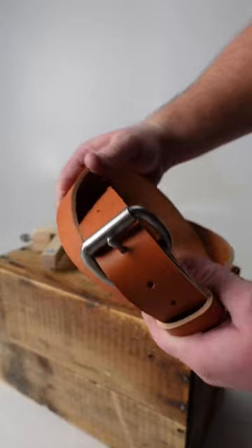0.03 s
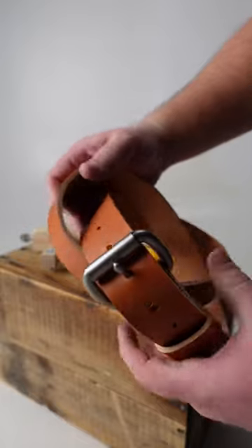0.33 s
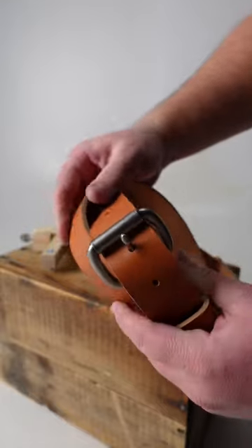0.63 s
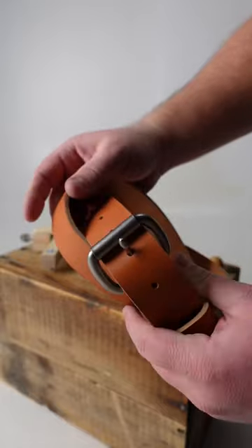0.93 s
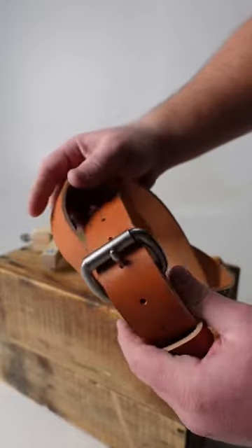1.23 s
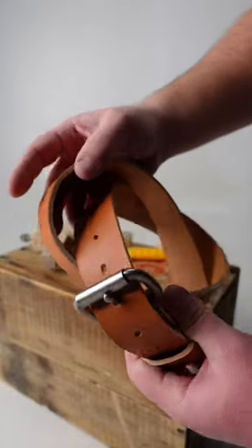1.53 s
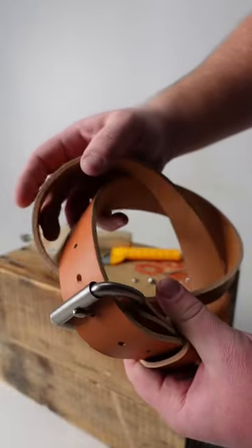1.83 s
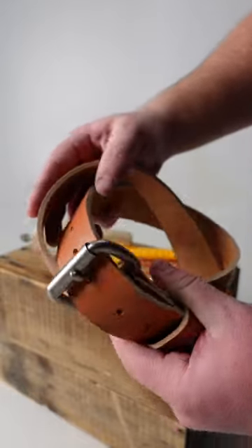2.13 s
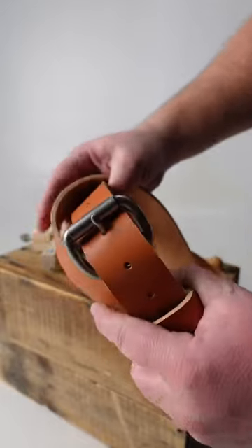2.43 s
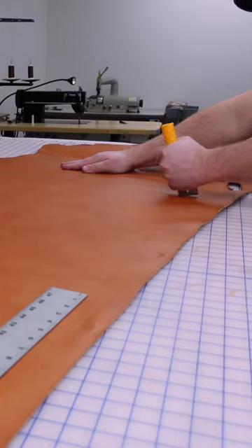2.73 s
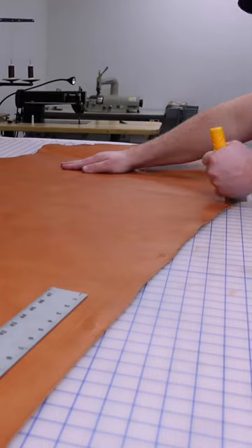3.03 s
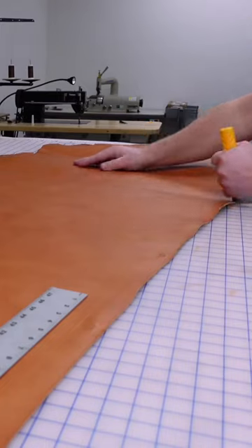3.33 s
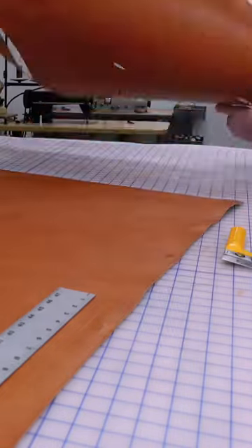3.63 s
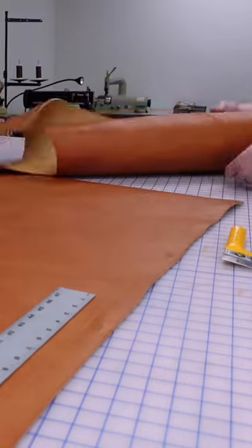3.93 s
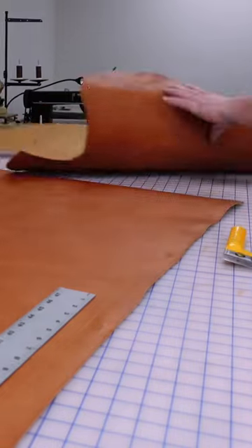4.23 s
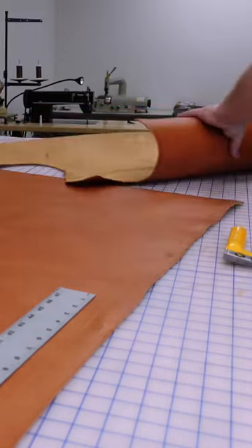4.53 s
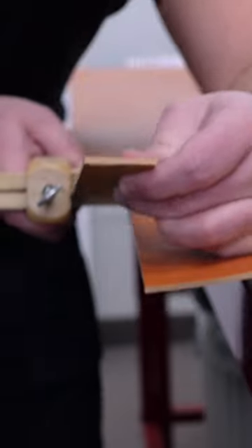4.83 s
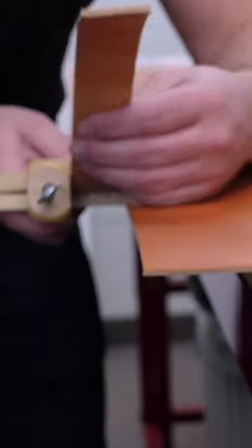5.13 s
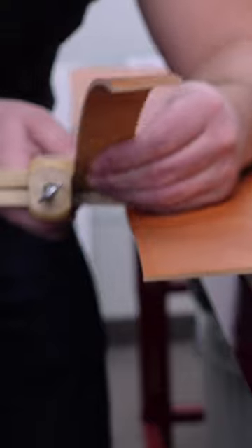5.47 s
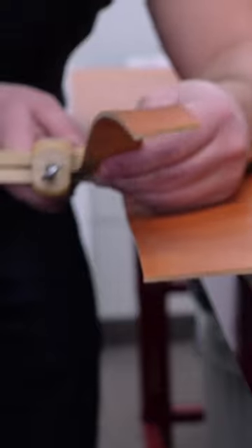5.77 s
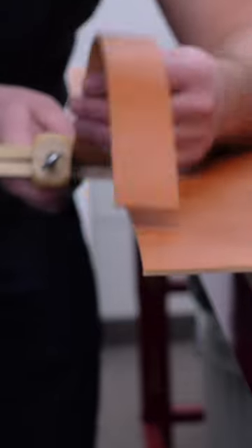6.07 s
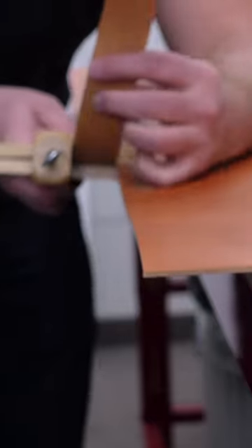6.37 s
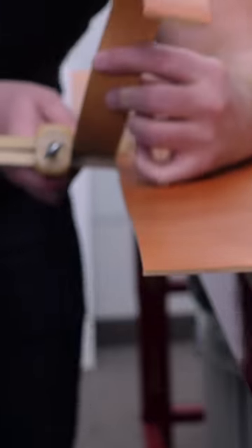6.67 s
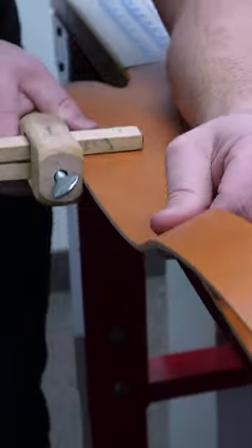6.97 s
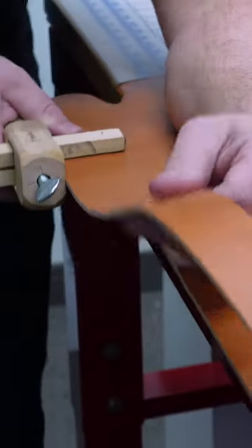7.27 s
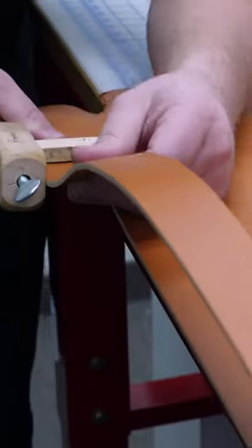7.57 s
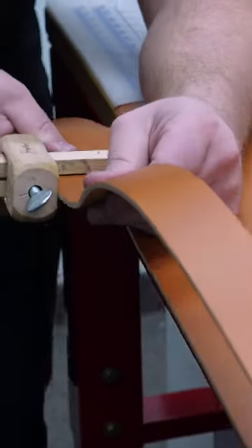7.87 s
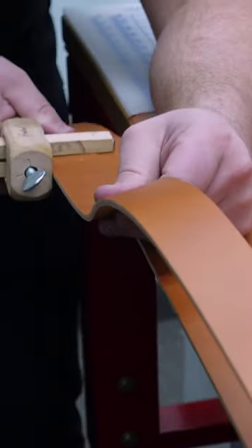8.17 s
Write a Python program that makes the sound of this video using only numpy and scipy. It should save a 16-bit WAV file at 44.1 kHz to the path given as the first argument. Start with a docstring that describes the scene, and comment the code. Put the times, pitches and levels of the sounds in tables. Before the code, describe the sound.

A leather belt rubs and its steel buckle clicks, then a hide is cut, flopped onto a table and sliced in rasping strokes.

```python
"""A leather belt rubs and creaks close by as hands flex it, its steel buckle clicking and knocking.
A rotary knife rolls through a hide on a workshop table; the offcut slides, flops down and cracks on
the mat. Then a wooden strap cutter is drawn along the hide in five strokes, its blade singing in the
first three, the hand sliding to a new grip in between. Rubs and cuts are the hiss and tiny snaps of
catching fibres; knocks and flops ring in damped modes. A low room rumble lies underneath."""
import sys
import numpy as np
from scipy import signal
from scipy.fft import rfft, irfft
from scipy.io import wavfile
from scipy.ndimage import uniform_filter1d

SR = 44100
rng = np.random.default_rng(int(sys.argv[2]) if len(sys.argv) > 2 else 0)


def materialize(psi):
    """Save the field psi as 16-bit PCM at rate SR to the path in sys.argv[1].

    A 1-D psi becomes a single channel; in a 2-D psi each row is a channel.
    """
    bounded = np.clip(np.atleast_2d(psi).T, -1, 1)
    quanta = np.round(bounded * 32767).astype(np.int16)
    wavfile.write(sys.argv[1], SR, quanta)


N = 366030
TIME = np.arange(N) / SR
HIT_SAMPLES = SR // 3
# four stretches of work, joined by hard cuts: from_s, to_s
AT_BELT, AT_TABLE, AT_STRAP_END, AT_MID_STRAP = (.034, 2.603), (2.603, 4.602), (4.602, 6.836), (6.836, 8.4)


def from_db(db):
    """Decibels to gain."""
    return 10 ** (np.asarray(db) / 20)


def rms_one(x):
    """Scale to unit rms."""
    return x / np.sqrt(np.mean(x ** 2) + 1e-20)


def peak_one(x):
    """Scale to unit peak."""
    return x / np.max(np.abs(x))


def band(x, hz, kind, order=2):
    """Butterworth filter."""
    return signal.sosfilt(signal.butter(order, np.clip(hz, 10, .45 * SR), kind, fs=SR, output="sos"), x)


def noise_band(edges_hz):
    """Steady band of noise at unit rms."""
    return rms_one(band(rng.standard_normal(N), edges_hz, "band"))


def colour(x, curve, size=4096):
    """Minimum-phase EQ along a curve of freq_hz, gain_db."""
    hz, db = np.transpose(curve)
    grid_hz = np.maximum(np.fft.rfftfreq(size, 1 / SR), 1)
    gain = from_db(np.interp(np.log(grid_hz), np.log(hz), db))
    cepstrum = irfft(np.log(gain))
    cepstrum[1:size // 2] *= 2
    cepstrum[size // 2 + 1:] = 0
    impulse = irfft(np.exp(rfft(cepstrum)))
    return signal.oaconvolve(x, impulse)[:len(x)]


def fade(t60):
    """Decay envelope that drops 60 dB in t60 seconds."""
    return from_db(-60 * TIME[:HIT_SAMPLES] / t60)


def burst(t60):
    """Noise that dies away."""
    return fade(t60) * rng.standard_normal(HIT_SAMPLES)


def ring(modes, spread_db, length=1, pitch=1):
    """One blow on a set of modes, each struck with a strength of its own; unit peak."""
    out = np.zeros(HIT_SAMPLES)
    for k, (hz, db, t60) in enumerate(modes):
        strength = (-1) ** k * from_db(db + spread_db * rng.standard_normal())
        out += strength * fade(t60 * length) * np.sin(2 * np.pi * hz * pitch * TIME[:HIT_SAMPLES])
    return peak_one(out)


def add(out, start_s, sound):
    """Mix a sound in at its cue."""
    start = round(start_s * SR)
    out[start:start + len(sound)] += sound[:N - start]


def during(span):
    """Gate that is open for a span of time, with short ramps."""
    return uniform_filter1d(1. * ((TIME >= span[0]) & (TIME < span[1])), size=128)


def swell(peak_s, rise_s, fall_s, hold_s=0):
    """Envelope of one movement; it is 10 dB down rise_s before the peak and fall_s after the hold."""
    away = np.maximum((peak_s - TIME) / rise_s, (TIME - peak_s - hold_s) / fall_s)
    roundness = 1.55  # 1 is a pointed swell, 2 a rounded one
    return from_db(-10 * np.clip(away, 0, 4) ** roundness) * (away < 4)


def rubs(rows):
    """Body and hiss envelopes of a series of rubs; where they overlap their powers add."""
    return np.sqrt(sum((from_db([[body_db], [hiss_db]]) * swell(peak_s, rise_s, fall_s)) ** 2
                       for peak_s, rise_s, fall_s, body_db, hiss_db in rows))


def friction(gains, curve, grains_per_s, grain_db, judder_db, resonances=()):
    """Fibres catch and snap as tiny clicks over a smooth hiss, while the whole contact judders."""
    snaps = (rng.random(N) < grains_per_s / SR) * rng.standard_normal(N)
    contact = rng.standard_normal(N) + from_db(grain_db) * rms_one(snaps)
    judder = rms_one(np.interp(TIME * 100, np.arange(N), rng.standard_normal(N)))  # 100 turns a second
    sound = colour(contact * from_db(judder_db * judder), curve)
    for hz, width_hz, boost_db in resonances:
        resonance = signal.lfilter(*signal.iirpeak(hz, hz / width_hz, fs=SR), sound)
        sound = sound + (from_db(boost_db) - 1) * resonance
    body = rms_one(band(sound, 2000, "low", order=3))
    hiss = rms_one(band(sound, 2000, "high", order=3))
    return gains[0] * body + gains[1] * hiss


# passes of the belt over itself: peak_s, rise_s, fall_s, body_db, hiss_db
BELT_RUBS = [(.06, 0.12, 0.072, -55, -51), (.175, 0.076, 0.068, -48.5, -48.5),
             (.32, 0.065, .08, -53.5, -50.5), (.51, 0.051, 0.21, -54, -54.5), (.67, 0.13, 0.13, -60, -49),
             (.89, 0.052, 0.066, -54, -52.5), (1.035, 0.054, 0.11, -56, -54),
             (1.21, 0.06, 0.12, -55, -49.5), (1.5, .14, 0.095, -63.5, -51),
             (1.665, 0.033, 0.018, -43.5, -48), (1.81, 0.24, 0.14, -59, -53.5),
             (2.11, 0.16, 0.13, -60.5, -58), (2.335, 0.062, 0.024, -56, -57), (2.53, 0.1, 0.11, -60.5, -49)]
# tone of leather on leather: freq_hz, gain_db
BELT_EQ = [(88, -40), (150, -9), (275, -16.5), (414, -10.5), (448, -15.5), (805, -3), (1560, -6.5),
           (2270, -9), (2550, -11.5), (3160, -7.5), (3550, -10.5), (8560, -14), (10400, -16.5),
           (13200, -13.5), (16000, -22.5)]
# resonances of the belt's loop: centre_hz, width_hz, boost_db
BELT_RESONANCES = [(753, 120, 7), (2260, 190, 3.5)]


def belt_rubs():
    """The flexed belt slides over itself with a grainy, juddering rub."""
    return friction(rubs(BELT_RUBS) * during(AT_BELT), BELT_EQ,
                    grains_per_s=700, grain_db=-2.5, judder_db=2.2, resonances=BELT_RESONANCES)


# steps in the rumble of room and bench: start_s, level_db
RUMBLE_STEPS = [(.034, -70), (2.603, -41), (3.161, -31), (3.503, -41), (4.07, -34.5), (4.602, -66.5),
                (6.836, -50.5), (7.5, -51)]
# sub-heavy tone of the rumble: freq_hz, gain_db
RUMBLE_EQ = [(8.8, -30), (15, 13.5), (26, -6.5), (43, -12), (91, -31), (156, -31.5), (200, -31.5),
             (260, -53.5), (440, -120)]
# tone of the workshop air: freq_hz, gain_db
AIR_EQ = [(53, -21), (90, 8.5), (385, -4.5), (753, -0.5), (1440, -7.5), (6440, -10), (8530, -14),
          (10400, -16), (13200, -13.5), (16000, -31)]


def room_tone():
    """The bed under the work: rumble of room and bench, steady air and a faint low drone."""
    starts_s, levels_db = np.transpose(RUMBLE_STEPS)
    steps = np.append(0, from_db(levels_db))[np.searchsorted(starts_s, TIME)]
    rumble = rms_one(colour(rng.standard_normal(N), RUMBLE_EQ, size=16384))
    air = rms_one(colour(rng.standard_normal(N), AIR_EQ))
    drone = noise_band(edges_hz=[45.4, 66.4])
    return uniform_filter1d(steps, size=256) * rumble + from_db(-66.5) * air + from_db(-71.5) * drone


# single slips of the leather: start_s, level_db, centre_hz
CREAK_SLIPS = [(.196, -33, 860), (.204, -30, 1200), (.242, -37, 5130), (.247, -24.5, 7200),
               (.413, -35.5, 2900), (.551, -29, 8770), (.666, -37, 2330), (.679, -31, 2790),
               (.795, -32, 1670), (1.99, -34, 3120), (2.31, -36.5, 1680), (2.38, -40, 1100),
               (2.501, -34.5, 810), (3.132, -25, 3000), (5.333, -41, 910), (7.872, -32.5, 1120)]
# runs of fainter ticks: start_s, length_s, level_db, centre_hz
CREAK_RUNS = [(0.709, .08, -33, 5450), (2.077, .17, -39, 3560), (5.887, .05, -52, 1100),
              (7.186, .05, -48, 1450)]


def creaks(gap_s=.021, spread_db=2.5, spread_octaves=.63):
    """Each slip of the leather is a short, broad tick; under strain they come in uneven runs."""
    out, slips = np.zeros(N), list(CREAK_SLIPS)
    for start_s, length_s, db, hz in CREAK_RUNS:
        for k, (late, softer, higher) in enumerate(rng.standard_normal((16, 3))):
            if k * gap_s < length_s:
                tick_s = start_s + gap_s * (k + .1 * late)
                slips.append((tick_s, db - spread_db * softer, hz * 2 ** (spread_octaves * higher)))
    for start_s, db, hz in slips:
        tick = band(burst(t60=.029), [hz * .51, hz * 1.7], "band", order=1)
        add(out, start_s, from_db(db) * peak_one(tick))
    return band(out, 10800, "low")


# steel on steel: start_s, level_db, decay_ratio
BUCKLE_CLICKS = [(0.5875, -15.5, 1.14), (0.639, -15, 1.3), (1.081, -24, 1.1), (1.1283, -19.5, 0.51),
                 (1.1617, -19, 0.6), (1.1918, -16, 0.98), (1.209, -26, 0.61), (1.2347, -12, 1.2),
                 (1.2406, -27, 0.91), (1.294, -20.5, 0.79), (1.46, -44.5, .9), (2.4389, -20.5, 0.56)]
# bright ring of the steel: pitch_hz, level_db, t60_s
STEEL_MODES = [(2320, -12, 0.044), (3100, -16, 0.021), (5850, -14, 0.015), (7470, -3, 0.005),
               (8300, -8.5, 0.017), (8690, -9, 0.044), (8750, -40, 0.42), (8750, -19, 0.022),
               (9870, -21, 0.031), (11600, -29, 0.033), (12950, -21, 0.031), (14850, -26, 0.069),
               (15620, -19, 0.015)]
# buckle against strap: start_s, level_db, snap_offset_db
BUCKLE_KNOCKS = [(0.5815, -9.5, 1.5), (0.5845, -20, 2), (1.2045, -20, 6), (1.6929, -19.5, 5),
                 (1.703, -28.5, 14), (1.7056, -31, 6), (1.822, -25.5, -11), (2.521, -28.5, -1),
                 (2.525, -16.5, -8.5)]
# dull ring of a knock: pitch_hz, level_db, t60_s
KNOCK_MODES = [(764, 4, 0.039), (936, 7.5, 0.026), (1220, -4.5, 0.024), (1530, -13, 0.004),
               (2260, -23, 0.017), (3100, 0, 0.036), (4300, 0, 0.0027)]


def buckle():
    """Steel clicks ring briefly, damped by the strap; knocks on the leather are duller."""
    out = np.zeros(N)
    for start_s, db, decay_ratio in BUCKLE_CLICKS:
        contact = peak_one(band(burst(t60=.0047), 3800, "high"))
        steel = ring(STEEL_MODES, spread_db=3.5, length=decay_ratio)
        add(out, start_s, from_db(db - 2) * steel + from_db(db + 2) * contact)
    for start_s, db, snap_db in BUCKLE_KNOCKS:
        snap = peak_one(band(burst(t60=.028), [1200, 9000], "band"))
        knock = ring(KNOCK_MODES, spread_db=3)
        add(out, start_s, from_db(db - 10) * knock + from_db(db + snap_db - 4.5) * snap)
    return out


# bends of the leather: peak_s, rise_s, fall_s, level_db, centre_hz
GROANS = [(1.606, 0.013, 0.1, -55.5, 238.6), (3.637, .004, 0.036, -46.5, 600),
          (6.135, 0.012, 0.03, -52.5, 680), (6.605, 0.018, 0.026, -45.5, 620),
          (6.88, .03, 0.036, -54.5, 170), (7.111, 0.027, 0.02, -50.5, 647), (7.387, 0.029, 0.014, -56, 800),
          (7.49, 0.019, .025, -53, 850), (7.628, 0.016, 0.065, -50.5, 433), (7.8, 0.04, .045, -54.5, 840),
          (7.91, 0.018, 0.048, -55, 750), (8.14, .012, 0.021, -55, 147.5)]


def groans():
    """Bending leather groans softly in one broad, low band."""
    return sum(from_db(db) * swell(peak_s, rise_s, fall_s) * noise_band([hz / 1.5, hz * 1.5])
               for peak_s, rise_s, fall_s, db, hz in GROANS)


# last push through the edge: peak_s, rise_s, fall_s, body_db, hiss_db
KNIFE_PUSH = [(3.12, 0.066, 0.05, -42, -48)]
# dark tone of the rolling blade: freq_hz, gain_db
KNIFE_EQ = [(71, -10), (120, -8), (301, -9), (341, -10), (445, -3), (592, -7), (643, -2), (839, 0.5),
            (1190, -9), (1980, -16.5), (2290, -22), (8660, -29), (10400, -31), (13300, -33.5), (16000, -43)]


def rotary_knife(full_s=2.58, leaves_s=3.11, body_db=-37, hiss_db=-43):
    """The blade rolls through the hide, fading as the pressure eases; a last push cuts the edge."""
    pressure = swell(full_s, rise_s=.18, fall_s=.22, hold_s=.27)
    in_hide = swell(full_s, rise_s=.18, fall_s=.045, hold_s=leaves_s - full_s)
    rolling = in_hide * [from_db(body_db) * pressure, from_db(hiss_db) * pressure ** .54]
    gains = np.hypot(rolling, rubs(KNIFE_PUSH)) * during(AT_TABLE)
    return friction(gains, KNIFE_EQ, grains_per_s=1500, grain_db=-4.5, judder_db=1.5)


# moves to a new grip: peak_s, rise_s, fall_s, body_db, hiss_db
HAND_SLIDES = [(3.38, 0.061, 0.065, -48.5, -40.5), (3.505, 0.0085, 0.11, -52.5, -46),
               (4.94, 0.034, .04, -65, -57.5), (5.04, 0.047, 0.077, -65, -52.5),
               (5.18, 0.12, 0.086, -81, -58.5), (5.9, 0.07, 0.029, -58, -65),
               (6.02, 0.21, 0.19, -66.5, -56.5), (6.385, 0.051, 0.02, -71, -60.5),
               (6.8, 0.027, 0.058, -60.5, -62), (7.37, 0.063, 0.047, -55.5, -49.5),
               (7.49, 0.12, 0.093, -59.5, -48), (7.635, 0.024, 0.03, -46, -57.5),
               (7.78, 0.064, 0.033, -53, -61.5)]
# tone of skin on leather: freq_hz, gain_db
HAND_EQ = [(88, -20), (150, -9), (244, -9.5), (675, -8), (716, -0.5), (837, -10), (979, -11), (1190, -10),
           (2700, -12.5), (8730, -12), (10400, -13), (13200, -13), (16000, -22.5)]


def hand_slides():
    """The hand brushes over the leather with a sparse grain."""
    return friction(rubs(HAND_SLIDES), HAND_EQ, grains_per_s=520, grain_db=-5, judder_db=1.16)


# drags over the mat: peak_s, rise_s, fall_s, body_db, hiss_db
HIDE_SLIDES = [(3.775, 0.075, 0.027, -52, -55.5), (3.83, 0.035, 0.024, -49, -57.5),
               (4.02, 0.088, 0.083, -40, -55.5), (4.275, 0.021, 0.046, -58, -33.5),
               (4.37, 0.16, 0.17, -40.5, -38.5)]
# tone of hide on the mat, sliding or slapping: freq_hz, gain_db
HIDE_EQ = [(71, -41.5), (120, -5), (261, 0.5), (712, 2), (1620, -2), (2340, -7.5), (3590, -7), (6500, -10),
           (8840, -18.5), (10600, -18.5), (13300, -19), (16000, -29)]


def hide_slides():
    """The loose hide swishes as it drags over the mat."""
    gains = rubs(HIDE_SLIDES) * during(AT_TABLE)
    return friction(gains, HIDE_EQ, grains_per_s=1100, grain_db=-7, judder_db=1.4)


# landings on the table: start_s, level_db, slap_offset_db, slap_t60_s, pitch_ratio
HIDE_FLOPS = [(3.7547, -16.5, -24, .098, 1.06), (3.7624, -26, -16, 0.13, 1.18),
              (3.854, -14, -10, 0.15, 1.5), (3.876, -12, -4.5, 0.085, 1.42), (3.889, -18, -6.5, 0.23, 1.1),
              (3.928, -28, -15.5, .087, 0.84), (3.985, -15.5, -5, 0.13, 1.6),
              (4.215, -26.5, -6, 0.023, 1.55), (4.264, -21.5, -1.5, 0.14, 1.09)]
# low thump of the sheet: pitch_hz, level_db, t60_s
HIDE_MODES = [(176.5, -14.5, 0.087), (275, -7, 0.057), (378, -4.5, 0.045), (448.7, 1, 0.04),
              (463, 0, 0.021), (647, -8.5, 0.019), (860, -14.5, 0.018)]


def hide_flops():
    """The sheet thumps in its low modes, and a slap spreads as more of it meets the table."""
    out = np.zeros(N)
    for start_s, db, slap_db, slap_t60, pitch in HIDE_FLOPS:
        slap = rms_one(colour(rng.standard_normal(HIT_SAMPLES), HIDE_EQ)) * fade(slap_t60)
        thump = ring(HIDE_MODES, spread_db=1.5, pitch=pitch)
        add(out, start_s, from_db(db) * thump + from_db(db + slap_db - 2) * slap)
    return out


# hits of the hide's edge: start_s, level_db
EDGE_CRACKS = [(3.8574, -14.5), (3.8760, -7.5), (3.8845, 8), (3.8848, -4.5), (3.8900, -11), (3.9876, -23),
               (4.365, -20.5)]
# bright tone of a crack: freq_hz, gain_db
CRACK_EQ = [(400, -14.5), (1500, -0.5), (3000, -2), (5500, -2.5), (8700, 0), (11000, -8.5), (16000, -19)]


def edge_cracks():
    """The stiff edge whips onto the mat in very short bursts."""
    out = np.zeros(N)
    for start_s, db in EDGE_CRACKS:
        add(out, start_s, from_db(db) * peak_one(colour(burst(t60=.0029), CRACK_EQ)))
    return out


# pulls on the cutter: peak_s, rise_s, hold_s, fall_s, body_db, hiss_db
CUTTER_STROKES = [(4.616, .04, 0.17, 0.048, -50, -40.5), (5.557, 0.07, 0.26, 0.024, -50.5, -41.5),
                  (6.603, 0.1, .15, 0.024, -47.5, -40.5), (6.838, 0.0053, 0.18, 0.073, -50.5, -43),
                  (8.03, 0.11, .11, 0.06, -50, -43)]
# tone of the cut at the strap's end and in mid strap: freq_hz, gain_db
STRAP_END_EQ = [(88, -29), (150, -18), (328, -18), (361, -11.5), (534, -9), (612, -5.5), (1790, -7),
                (2140, -3.5), (3700, -9), (8730, -7), (10400, -10), (12900, -5), (16000, -19.5)]
MID_STRAP_EQ = [(88, -26), (150, -11), (448, 2.5), (578, -1.5), (649, 7), (716, 4.5), (1790, -5),
                (2180, -5), (3920, -11), (7320, -8.5), (10400, -12), (13700, -10.5), (16000, -19)]
# resonances of the cutter in the same two places: centre_hz, width_hz, boost_db
STRAP_END_RESONANCES = [(2360, 68, 4.5), (2780, 300, 4.4), (5440, 1160, 5.4)]
MID_STRAP_RESONANCES = [(640, 33, 1.6), (2210, 76, 11.7), (2950, 220, 8), (3580, 220, 4.7), (7240, 460, 6)]


def strap_cutter(sing_db=-51.5, squeak_db=-44.5, squeak_lead_s=.046):
    """The blade rasps with each pull; at the strap's end it sings too, most just before a stroke ends."""
    gains, singing = np.zeros((2, N)), np.zeros(N)
    for peak_s, rise_s, hold_s, fall_s, body_db, hiss_db in CUTTER_STROKES:
        pull = swell(peak_s, rise_s, fall_s, hold_s)
        squeak = swell(peak_s + hold_s - squeak_lead_s, rise_s=.039, fall_s=.051)
        gains += [from_db(body_db) * pull ** .58, from_db(hiss_db) * pull]
        singing += np.hypot(from_db(sing_db) * pull, from_db(squeak_db) * squeak)
    end_cuts = friction(gains * during(AT_STRAP_END), STRAP_END_EQ,
                        grains_per_s=3200, grain_db=-9.5, judder_db=1.52, resonances=STRAP_END_RESONANCES)
    mid_cuts = friction(gains * during(AT_MID_STRAP), MID_STRAP_EQ,
                        grains_per_s=2500, grain_db=-2.5, judder_db=.5, resonances=MID_STRAP_RESONANCES)
    blade_song = singing * during(AT_STRAP_END) * noise_band(edges_hz=[2125, 2215])
    return end_cuts + mid_cuts + blade_song


# warm tone of the reverb tail: freq_hz, gain_db
ROOM_EQ = [(60, -23), (250, 7), (800, 5), (3000, -0.5), (8000, -1.5), (16000, -11)]


def room(x, t60, wet_db, predelay_s=.004):
    """The direct sound and a diffuse tail that starts with the first echo off the table."""
    t = TIME[:SR]
    decay = from_db(-60 * t / t60) * (t > predelay_s)
    tail = colour(rng.standard_normal(SR) * decay, ROOM_EQ)
    return x + from_db(wet_db) * signal.oaconvolve(x, tail / np.linalg.norm(tail))[:N]


def scene():
    """Belt, hide and strap cutter in turn over the room tone, in mono."""
    close = belt_rubs() + room_tone() + buckle() + groans()
    creaking = room(creaks(), t60=.24, wet_db=-13.5)
    cutting = room(rotary_knife() + strap_cutter(), t60=.09, wet_db=-11)
    sliding = room(hand_slides() + hide_slides(), t60=.079, wet_db=-16)
    landing = room(hide_flops() + edge_cracks(), t60=.32, wet_db=-13)
    return (close + creaking + cutting + sliding + landing)[None]


# the microphone's uneven treble: freq_hz, gain_db
MICROPHONE_EQ = [(20, 2.5), (7000, -1.5), (8800, 2.5), (9600, -3), (10700, -5), (13000, -0.5), (14500, -2),
                 (16000, 0.5)]


def record(dry, cutoff_hz=15900):
    """Microphone colour, overload at full scale, and a steep top cut."""
    clipped = np.clip(colour(dry[0], MICROPHONE_EQ), -1, 1)
    top_cut = signal.ellip(10, .1, 80, cutoff_hz, fs=SR, output="sos")
    return signal.sosfilt(top_cut, clipped)[None]


dry = scene()
out = record(dry)
materialize(out)
```